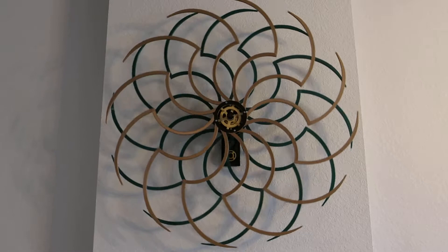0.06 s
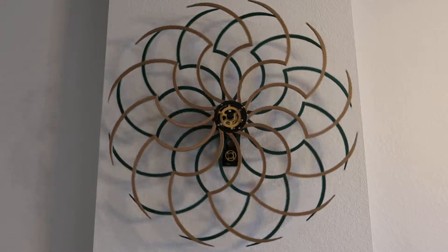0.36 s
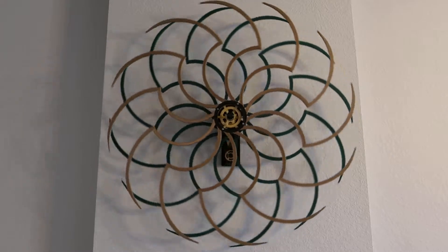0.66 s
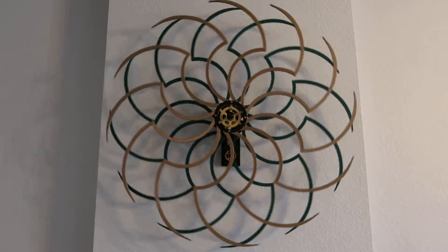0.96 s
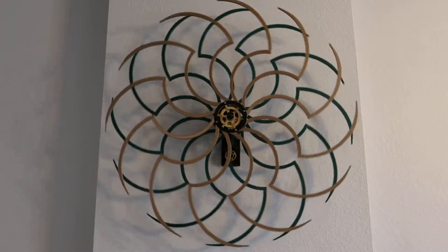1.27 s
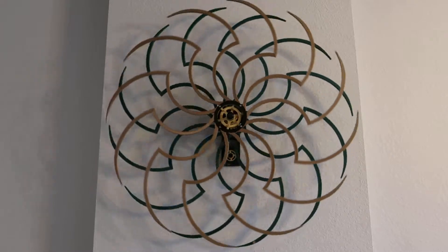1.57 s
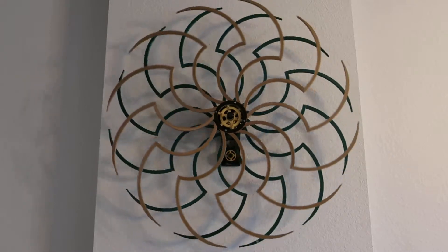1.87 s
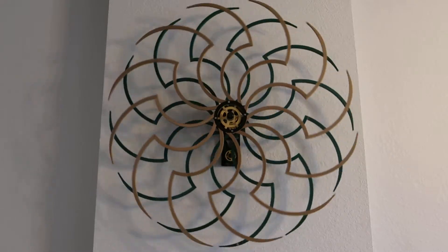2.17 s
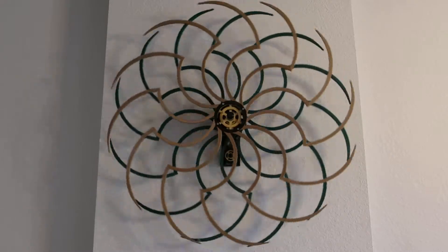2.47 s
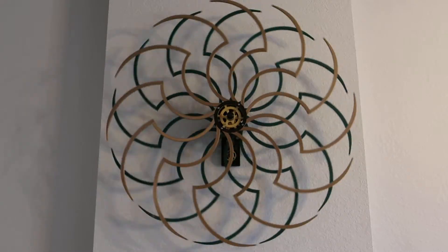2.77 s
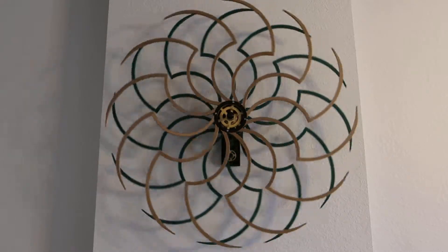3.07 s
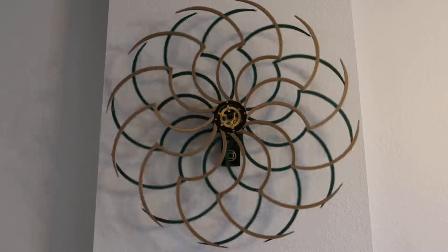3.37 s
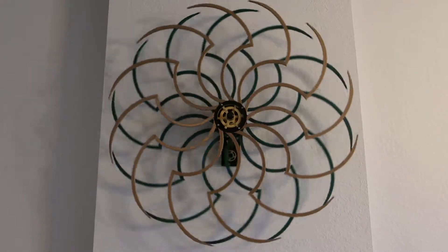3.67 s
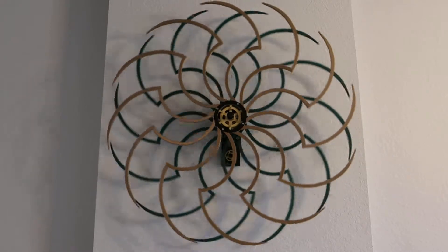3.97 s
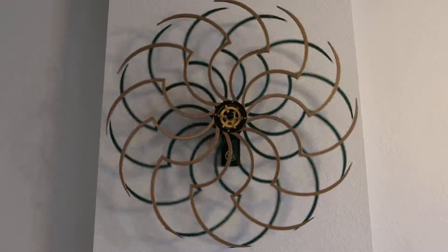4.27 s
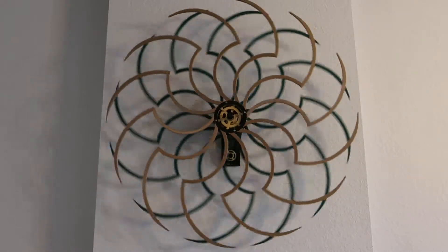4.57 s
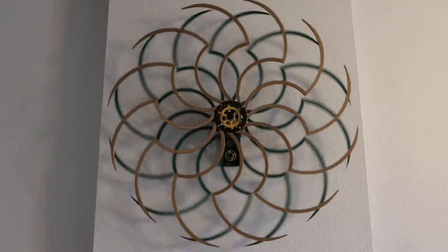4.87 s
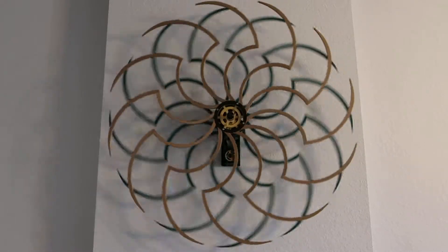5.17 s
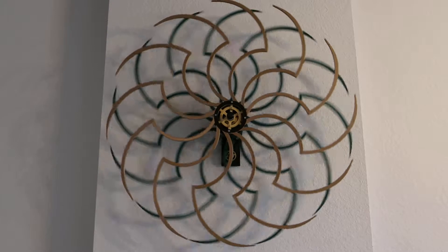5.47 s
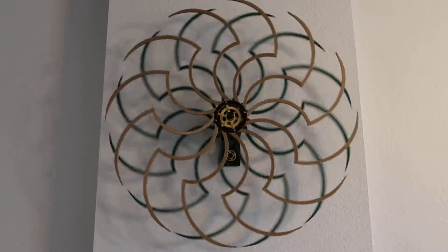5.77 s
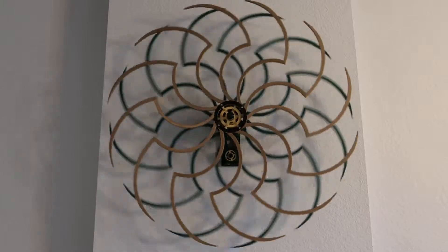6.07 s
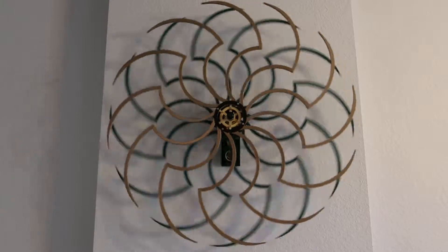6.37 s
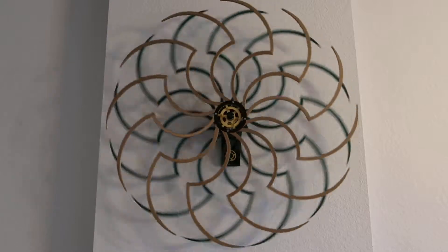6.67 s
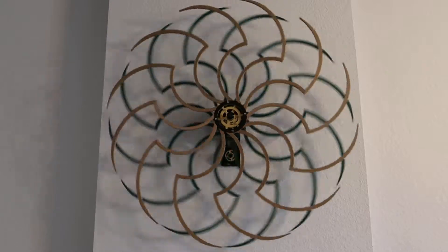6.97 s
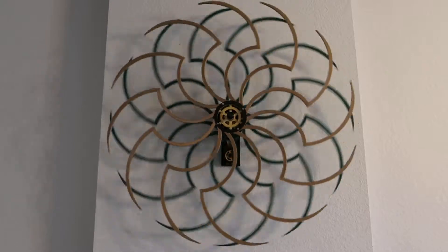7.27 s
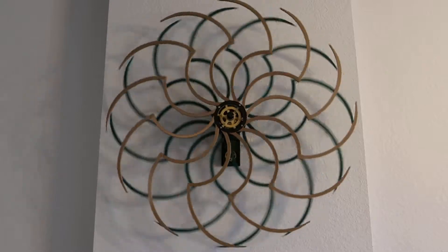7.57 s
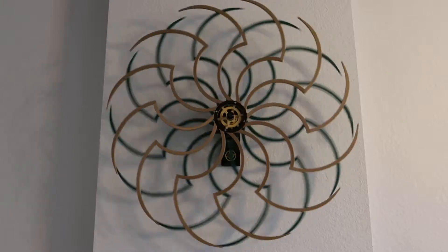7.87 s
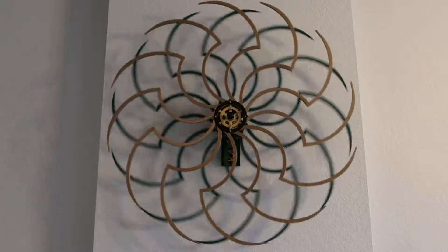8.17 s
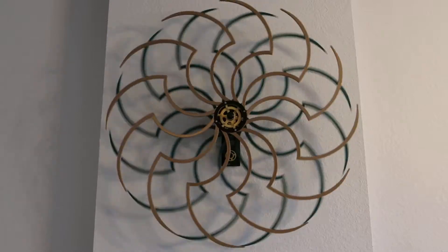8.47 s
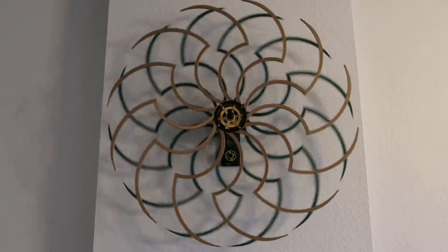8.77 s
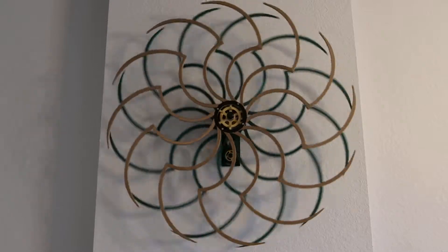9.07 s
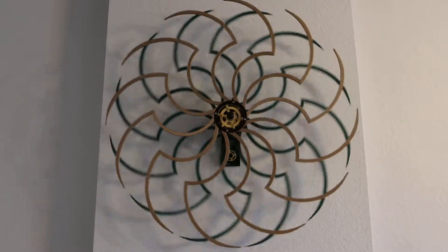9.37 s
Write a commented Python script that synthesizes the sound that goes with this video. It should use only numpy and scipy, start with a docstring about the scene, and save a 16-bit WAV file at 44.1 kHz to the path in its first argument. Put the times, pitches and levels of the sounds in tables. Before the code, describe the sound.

A spring-driven wooden sculpture turns in a small, bare room with a short echo. A faint low appliance hum continues throughout. Soft knocks and light taps open, followed by a wooden clack and bright metal click at about 1.1 seconds. After a lull, a ratchet ticks rapidly and rasps from 2.9 to 4.1 seconds, swelling and fading over the soft drone of a sliding wheel. Scattered clacks and clicks follow between 4.3 and 5 seconds. At 5.3 seconds a hard knock, the loudest sound, briefly rings the wooden body. Three shorter, faster runs of rasping ticks come at about 5.4 to 5.8, 6.9 to 7.4 and 8.5 to 9.1 seconds. Between them, levers clack on wooden stops and a metal catch clicks, around 6, 6.5 to 6.7, 7.6 and 8.1 to 8.4 seconds. A last clack lands near 9.3 seconds.

```python
"""A spring-driven wooden kinetic sculpture turns on the wall of a small, bare room; an appliance hums.
First, levers clack on wooden stops, a metal catch clicks and the drive knocks softly on the frame.
From 2.9 to 4.1 s a pawl ticks and rasps over ratchet teeth while the sliding wheel drones.
At 5.3 s a hard knock rings the frame. Three shorter ratchet runs follow at 5.4, 6.9 and 8.5 s,
with clacks and clicks in between."""
import sys
import numpy as np
from scipy import signal
from scipy.fft import rfft, irfft, next_fast_len
from scipy.io import wavfile
from scipy.ndimage import uniform_filter1d

SR = 44100
rng = np.random.default_rng(int(sys.argv[2]) if len(sys.argv) > 2 else 0)


def wav_record(signal):
    """Record a signal, one row per channel, as 16-bit PCM in the file named by sys.argv[1]."""
    frames = np.transpose(np.atleast_2d(signal))
    bounded = np.clip(frames, -1, 1)
    # unit amplitude maps onto the largest positive 16-bit level
    quanta = np.round(bounded * 32767).astype(np.int16)
    wavfile.write(sys.argv[1], SR, quanta)


N = 415422

# spectra of still air and room rumble: (frequency [Hz], density [dB])
AIR_SPECTRUM = [(15,-37),(45,-13.5),(80,-9.5),(119,-2),(155,-16.5),(215,-8.5),(380,-15),(600,-21),(1200,-24),(2500,-29),(6000,-37),(9000,-44),(12000,-54),(15500,-65)]
RUMBLE_SPECTRUM = [(15,-1),(35,-1),(68,6),(95,-7.5),(138,5),(190,-10.5),(280,-10),(390,-7),(520,-17.5),(1500,-76)]
# rumble envelope: (time [s], level [dB])
RUMBLE_LEVELS = [(0.0, -51.5), (1.26, -54.5), (1.86, -59), (2.91, -55.5), (4.99, -55.5), (5.27, -52.5),
                 (9.42, -50)]
# appliance noise bands: (frequency [Hz], width [Hz], level [dB])
HUM_BANDS = [(118.6,16.6,-57),(1150,7.3,-72.5),(1146,115,-68.5)]
# room decay: (frequency [Hz], T60 [s])
ROOM_DECAY = [(100,0.73),(500,0.4),(2000,0.66),(5000,0.58),(9000,0.49),(15000,0.37)]
# stereo width of echo and air: (frequency [Hz], side minus mid [dB])
ECHO_STEREO = [(40,-36),(160,-28),(380,-17),(1000,-21),(2500,-13.5),(6000,-5.5),(13000,1)]
AIR_STEREO = [(30,-28),(70,-44),(120,-9.5),(200,-3.5),(400,4),(900,5.5),(7000,5),(14000,12)]

# blows on the frame: (time [s], level [dB], contact resonance [Hz], Q [-])
FRAME_BLOWS = [(0.143,-44,245,2.5),(0.219,-53,322,5.8),(1.086,-39,390,2.4),(1.099,-44.5,367,11.4),(1.119,-42,127,2.2),(1.208,-54,348,3),(4.050,-46.5,340,2.3),(4.913,-52.5,810,2.8),(5.258,-32.5,3000,0.96),(5.269,-22,5000,0.11),(5.281,-33.5,3000,0.83)]
# frame modes: (frequency [Hz], level [dB], T60 [s])
FRAME_MODES = [(65.8,-6.5,1.0),(128.8,1,0.31),(170.2,1,0.53),(242,-0.5,0.66),(291,5,0.26),(386,-1,0.345),(420,6,0.077),(533,-16,0.37),(578,-4,0.28),(677,-9,0.12),(770,3,0.3),(886,2.5,0.52),(940,0,0.2),(1080,-7,0.19),(1357,-12,0.48),(1776,-7,.3),(2330,-11,.45),(2502,-4,.4),(2520,1,.45)]
# dense frame modes, heard as a crack: (frequency [Hz], density [dB])
CRACK_SPECTRUM = [(35,-25),(100,-2),(280,1.5),(450,-2),(850,1.5),(1080,-25),(1220,-19),(1400,-1.5),(1600,-14),(2000,-4.5),(2550,-1),(3500,-8),(4500,-27),(7000,-2.5),(15000,-19.5)]

# lever falls on its stop: (time [s], level [dB], relative rebound [dB])
LEVER_FALLS = [(0.308,-57,0.5),(0.780,-60,-13),(1.117,-48.5,-7),(3.786,-45,-20),(4.306,-44.5,-23),(4.354,-48,-23),(5.120,-58.5,-14),(5.259,-32.5,-2),
               (6.036,-44,-4),(6.746,-50.5,-2),(7.631,-48,-4.5),(8.136,-45,-21),(8.394,-52,-3),(9.326,-45.5,-0.5)]
# catch drops in: (time [s], ring [dB], snap [dB], ping 1 [Hz], ping 1 [dB], ping 2 [Hz], ping 2 [dB])
CATCH_DROPS = [(1.082,-42.5,-43.5,5700,-48,3050,-52),(1.114,-43,-58,5570,-44,6260,-46),(2.515,-59,-55.5,4220,-55,6540,-63),(3.802,-45,-58,5650,-45,6240,-51),
               (4.318,-41.5,-48,4500,-49,5560,-44),(4.63,-48.5,-59,3640,-51.5,5540,-67),(4.693,-42.5,-47.5,5470,-40.5,6460,-46),(4.995,-47,-62,3570,-60,5660,-62),
               (5.008,-48,-48,3710,-49.5,7100,-50),(5.245,-44,-54,5400,-53,6300,-57),(5.257,-37,-58,5370,-46,6320,-35.5),(5.274,-32,-34.5,5730,-41,7480,-40),
               (6.500,-41,-42.5,5580,-48,6520,-44),(6.607,-57,-42.5,5600,-58,7200,-53),(6.643,-54,-49,5590,-53,6400,-62),(6.669,-59,-56,5540,-50,6400,-59),
               (6.746,-53,-53,5650,-48,6350,-48),(8.136,-41.5,-46,5540,-47,6500,-44),(8.246,-58,-44,5590,-60,7100,-57),(8.291,-55,-52,5580,-52,6500,-56),
               (8.395,-55,-53,5700,-44.5,6400,-53),(8.415,-44.5,-54,5630,-49,6600,-54)]
# resonances of lever, catch, its snap, pawl and wheel rim: (frequency [Hz], width [Hz], level [dB])
LEVER_MODES = [(720,280,4),(1067,99,8),(1306,100,4),(1876,345,7),(2083,394,8),(2820,420,5.5),(3640,480,4),(4770,660,1.5),(5370,420,-1.5)]
CATCH_MODES = [(3250,340,0.5),(3770,340,0.5),(4200,270,-11),(5490,320,3.5),(6370,330,1),(6980,560,-2.5)]
SNAP_MODES = [(2780,1050,-0.5),(8120,1600,2.5),(8800,1600,4.5),(10040,700,4),(11440,900,-1.5),(13000,840,-1.5)]
PAWL_MODES = [(2580,390,4),(3040,170,10),(3650,770,7),(4490,146,13.5),(5370,910,3),(7180,1060,5.5),(8320,270,5),(9300,1260,2),(11300,3100,-6),(13600,1900,-9)]
RIM_MODES = [(1048.4,30.5,11.5),(1843,410,1.5),(2180,385,5),(3100,370,2),(3800,170,6.5),(4590,480,4.5),(5800,1200,-1),(7480,1140,-1.5),(8900,1600,-10),(12900,1800,-19.5)]

# sliding wheel: (frequency [Hz], density [dB])
DRONE_SPECTRUM = [(80,8),(150,-4.5),(270,2.5),(420,2),(650,1),(950,-1),(1280,-6.5),(1550,-21),(3000,-51)]
# wheel spins under the pawl: (start [s], peak [s], end [s], rasp [dB], drone [dB])
WHEEL_RUNS = [(2.892,3.315,4.1,-46.5,-50), (5.38,5.46,5.82,-43,-46), (6.89,7.032,7.43,-45,-48.5),
              (8.515,8.72,9.1,-44.5,-52)]
# wheel drags briefly: (time [s], level [dB])
WHEEL_DRAGS = [(2.92,-49),(4.08,-48.5),(5.16,-44.5),(8.70,-43),(9.40,-42.5)]
# pawl drops off unevenly cut teeth: (time [s], level [dB])
TOOTH_DROPS = [(2.7192, -55), (2.784, -50), (2.8806, -41.5), (2.9367, -39.5), (2.9952, -37.5), (3.052, -37),
               (3.1098, -37), (3.1648, -34.5), (3.2213, -33.5), (3.279, -35.5), (3.3373, -36),
               (3.3948, -35.5), (3.4486, -39.5), (3.5059, -37.5), (3.5571, -39.5), (3.6125, -39.5),
               (3.6674, -37.5), (3.7219, -39.5), (3.78, -41), (3.833, -41.5), (3.8916, -44), (3.9378, -41),
               (4.055, -52), (5.1846, -44), (5.3994, -35.5), (5.4287, -38.5), (5.458, -35.5),
               (5.4905, -38.5), (5.522, -37), (5.5538, -35), (5.588, -41), (5.6167, -35), (5.655, -41),
               (5.6778, -41), (5.7084, -41), (5.7465, -39.5), (5.7845, -43), (6.8494, -39), (6.863, -41),
               (6.8932, -40), (6.925, -37), (6.9597, -37), (6.99, -35), (7.0252, -35.5), (7.0612, -37.5),
               (7.0838, -39), (7.116, -36.5), (7.1516, -37), (7.189, -38.5), (7.222, -39), (7.259, -38),
               (7.2978, -40), (7.3324, -40), (7.367, -45), (7.4066, -46), (8.4728, -40), (8.5182, -34.5),
               (8.552, -37), (8.5834, -40), (8.6154, -40.5), (8.6472, -35), (8.6832, -36.5), (8.7144, -38),
               (8.7472, -37), (8.783, -38), (8.819, -39), (8.8555, -38), (8.8935, -34.5), (8.9328, -37.5),
               (8.976, -41), (9.0147, -43), (9.0538, -49), (9.1012, -47)]
# sharp pawl partials: (centre [s], half length [s], frequency [Hz], gain [dB])
PAWL_PARTIALS = [(2.70,0.13,4560,4),(2.935,0.13,8440,-12),(3.064,0.072,5920,-5.5),(3.42,0.089,4400,-6),(3.53,0.14,2220,-7.5),(3.58,0.092,3900,-9),(3.704,0.12,6050,-5),
                 (5.558,0.068,4140,-9),(5.62,0.27,8240,-10),
                 (6.94,0.053,8300,-11),(6.96,0.069,4030,-8),(7.03,0.046,4740,-4),(7.12,.07,7050,-4),(7.22,0.039,5760,-4),
                 (8.75,0.05,3770,-6),(8.88,0.088,6000,-9),(8.92,0.08,4540,-7)]


def from_db(db):
    """Decibels to gain."""
    return 10 ** (np.asarray(db) / 20)


def rms_one(x):
    """Scale to rms 1."""
    return x / np.sqrt(np.mean(x ** 2) + 1e-20)


def at_hz(points, hz):
    """Read a table on a log-frequency axis."""
    table_hz, value = np.transpose(points)
    return np.interp(np.log(np.maximum(hz, 1)), np.log(table_hz), value)


def add(out, time_s, sound):
    """Mix a sound in at time_s."""
    start = int(time_s * SR)
    part = sound[..., :max(out.shape[-1] - start, 0)]
    out[..., start:start + part.shape[-1]] += part


def diffuse(size, stereo, colour=lambda hz: 1):
    """Stereo noise of given width and colour; mid rms 1."""
    hz = np.fft.rfftfreq(size, 1 / SR)
    mid, side = rfft(rng.standard_normal((2, size))) * colour(hz)
    mid, side = irfft(mid, size), irfft(side * from_db(at_hz(stereo, hz)), size)
    return (mid + side * [[1], [-1]]) / np.std(mid)


def steady(spectrum, stereo):
    """Scene-long stereo noise of given spectrum."""
    return diffuse(next_fast_len(N), stereo, lambda hz: from_db(at_hz(spectrum, hz)))[:, :N]


def resonate(force, modes):
    """Damped modes of a small part in parallel; unit power gain."""
    t = np.arange(SR // 20) / SR
    response = sum((-1) ** k * from_db(db) * width_hz * np.exp(-np.pi * width_hz * t)
                   * np.cos(2 * np.pi * hz * t) for k, (hz, width_hz, db) in enumerate(modes))
    return signal.oaconvolve(force, response / np.linalg.norm(response))[:N]


def chatter(rise_s, fade_s):
    """Force of one contact: fine chatter builds and dies."""
    t = np.arange(SR // 20) / SR
    shape = (1 - np.exp(-(t / rise_s) ** 2)) * np.exp(-t / fade_s)
    return rng.standard_normal(len(t)) * shape / shape.max()


def background(whine_hz=1137, whine_db=-69):
    """Still air, low rumble, an appliance's wavering hum and thin whine."""
    hum = 0
    for hz, width_hz, db in HUM_BANDS:
        band = diffuse(next_fast_len(N), ECHO_STEREO, lambda f: 1 / (1 + (2 * (f - hz) / width_hz) ** 2))
        hum = hum + from_db(db) * band[:, :N]
    t = np.arange(N) / SR
    whine = from_db(whine_db) * np.sqrt(2) * np.sin(2 * np.pi * whine_hz * t)
    rumble_db = np.interp(t, *np.transpose(RUMBLE_LEVELS)) + 1
    rumble = from_db(rumble_db) * steady(RUMBLE_SPECTRUM, ECHO_STEREO)
    return from_db(-53) * steady(AIR_SPECTRUM, AIR_STEREO) + rumble + hum + whine


def room_response(gap_s, early_s, early_db):
    """Dense early reflections and a tail decaying per band; unit energy per channel."""
    t = np.arange(SR * 3 // 4) / SR
    hz = np.fft.rfftfreq(len(t), 1 / SR)
    spectrum = rfft(diffuse(len(t), ECHO_STEREO))
    edges_hz = np.geomspace(60, 18000, 13)
    tail = 0
    for low, high in zip(edges_hz, edges_hz[1:]):
        band = irfft(spectrum * ((hz >= low) & (hz < high)), len(t))
        t60_s = at_hz(ROOM_DECAY, np.sqrt(low * high))
        tail = tail + band * np.exp(-np.log(1000) * t / t60_s)
    onset = np.clip(t / gap_s - 1, 0, 1)
    tail = tail * onset * (1 + from_db(early_db) * np.exp(-t / early_s))
    return tail / np.sqrt(np.sum(tail ** 2) / 2)


def frame_knocks(crack_s, swell_s, lowest_hz=50):
    """Blows ring the frame under a short crack; soft blows reach only the low modes."""
    boom, crack = np.zeros((2, N))
    t = np.arange(SR) / SR
    ring = sum(from_db(db) * np.sin(2 * np.pi * hz * t) * np.exp(-np.log(1000) * t / t60_s)
               for hz, db, t60_s in FRAME_MODES)
    radiation = signal.butter(2, lowest_hz, "high", fs=SR, output="sos")   # small frame: no deep bass
    ring = signal.sosfilt(radiation, ring * (1 - np.exp(-t / swell_s)))
    colour = from_db(at_hz(CRACK_SPECTRUM, np.fft.rfftfreq(SR, 1 / SR)))
    for time_s, db, contact_hz, q in FRAME_BLOWS:
        w = 2 * np.pi * contact_hz
        springy_contact = signal.bilinear([w * w], [1, w / q, w * w], SR)   # resonant low-pass
        add(boom, time_s, from_db(db - 9) * signal.lfilter(*springy_contact, ring))
        burst = rms_one(irfft(rfft(rng.standard_normal(SR)) * colour, SR)) * np.exp(-t / crack_s)
        add(crack, time_s, from_db(db) * signal.lfilter(*springy_contact, burst))
    return boom, crack


def struck(times_s, levels_db, modes, rise_s, fade_s, detune=0.015, scatter_db=2):
    """Contacts on a small part; each lands elsewhere, so the modes vary in pitch and level."""
    out = np.zeros(N)
    for time_s, db in zip(times_s, levels_db):
        shifts = rng.standard_normal((len(modes), 2))
        shifted = [(hz * (1 + detune * a), width_hz, mode_db + scatter_db * b)
                   for (hz, width_hz, mode_db), (a, b) in zip(modes, shifts)]
        add(out, time_s, from_db(db) * resonate(chatter(rise_s, fade_s), shifted))
    return out


def catch_pings(rise_s=0.00066, fade_s=0.0026):
    """Each drop of the catch rings two partials, set by where it lands."""
    out, t = np.zeros(N), np.arange(SR // 10) / SR
    envelope = (1 - np.exp(-t / rise_s)) * np.exp(-t / fade_s)
    for time_s, _, _, ping1_hz, ping1_db, ping2_hz, ping2_db in CATCH_DROPS:
        for hz, db in ((ping1_hz, ping1_db), (ping2_hz, ping2_db)):
            add(out, time_s, from_db(db) * envelope * np.sin(2 * np.pi * hz * t))
    return out


def levers(rebound_s=0.0195, to_ring_db=-1, to_snap_db=-12.5, to_wood_db=-7):
    """A lever clacks on wood and rebounds once; its catch rings and snaps. Each shakes the other."""
    falls = [(s, db) for s, db, _ in LEVER_FALLS]
    falls += [(s + rebound_s, db + rebound_db) for s, db, rebound_db in LEVER_FALLS]
    contacts = [(s, db, db + to_ring_db, db + to_snap_db) for s, db in falls]
    contacts += [(s, db + to_wood_db, db, snap_db) for s, db, snap_db, *_ in CATCH_DROPS]
    times_s, wood_db, ring_db, snap_db = np.transpose(contacts)
    onsets_s = times_s - 0.001   # contact begins just before it is heard
    clack = from_db(-2.5) * struck(onsets_s, wood_db, LEVER_MODES, rise_s=0.0037, fade_s=0.0032)
    ring = from_db(-2.5) * struck(onsets_s, ring_db, CATCH_MODES, rise_s=0.0029, fade_s=0.002)
    snap = from_db(-0.5) * struck(onsets_s, snap_db, SNAP_MODES, rise_s=0.0015, fade_s=0.0027)
    return clack, ring + from_db(7.5) * catch_pings(), snap


def wheel_drone(drag_s=0.065, fade_db=-6.5, rise_db_per_s=54, coast_db_per_s=8):
    """The sliding wheel drones: a swell per drag, a longer one per run that coasts away."""
    t = np.arange(N) / SR
    gain = sum(from_db(db) * np.exp(-((t - time_s) / drag_s) ** 2) for time_s, db in WHEEL_DRAGS)
    for start_s, peak_s, end_s, _, drone_db in WHEEL_RUNS:
        before_s, after_s = np.maximum(start_s - t, 0), np.maximum(t - end_s, 0)
        run_db = drone_db + np.interp(t, [peak_s, end_s], [0, fade_db])
        gain = np.hypot(gain, from_db(run_db - rise_db_per_s * before_s - coast_db_per_s * after_s))
    return gain * steady(DRONE_SPECTRUM, ECHO_STEREO)


def pawl_friction(clump_db, grains_per_s=2500, creep_s=0.39, engage_s=0.096, stop_db_per_s=302):
    """Wood grain catches and frees the pawl; each run creeps, engages, swells, fades and stops."""
    t, gain = np.arange(N) / SR, 0
    for start_s, peak_s, end_s, rasp_db, _ in WHEEL_RUNS:
        swell_db = np.interp(t, [start_s - engage_s, start_s, peak_s, end_s], [-13.5, -5.5, 0, -6])
        stop_db = stop_db_per_s * np.maximum(t - end_s, 0)
        gain = gain + (start_s - t < creep_s) * from_db(rasp_db + swell_db - stop_db)
    wander = rms_one(uniform_filter1d(rng.standard_normal(N), size=200))
    grip = from_db(clump_db * np.tanh(wander))
    grains = (rng.random(N) < grains_per_s / SR) * rng.choice([-1, 1], N) * rng.random(N)
    return gain * rms_one(grains * grip)


def pawl_singing(force, q=85):
    """As the contact point travels, sharp partials take up the pawl's force and let go."""
    out = np.zeros(N)
    for centre_s, half_s, hz, db in PAWL_PARTIALS:
        start_s = max(centre_s - 3 * half_s, 0)
        stretch = force[int(start_s * SR):int((2 * centre_s - start_s) * SR)]
        t = start_s + np.arange(len(stretch)) / SR
        coupling = from_db(db) * np.exp(-((t - centre_s) / half_s) ** 2 / 2)
        add(out, start_s, resonate(stretch * coupling, [(hz, hz / q, 0)]))
    return out


def pawl_drop(bounces=4, gap_s=0.008, bounce_db=-4, loss_db=0.5, scatter_db=7.7):
    """Force of the pawl dropping off one tooth and bouncing loosely."""
    force, time_s = np.zeros(SR // 6), 0
    add(force, time_s, chatter(rise_s=0.003, fade_s=0.0025))
    for k, (late, weaker) in enumerate(rng.random((bounces, 2))):
        time_s += gap_s * (0.5 + late)
        gain = from_db(bounce_db - loss_db * k - scatter_db * weaker)
        add(force, time_s, gain * chatter(rise_s=0.00099, fade_s=0.0006))
    return force


def ratchet(colour_db, clump_db):
    """The pawl ticks off each tooth in a new colour; its friction rasps on the wheel rim."""
    force, ticks = np.zeros((2, N))
    for time_s, db in TOOTH_DROPS:
        drop = from_db(db) * pawl_drop()
        modes = [(hz, width_hz, mode_db + colour_db * rng.standard_normal())
                 for hz, width_hz, mode_db in PAWL_MODES]
        add(force, time_s, drop)
        add(ticks, time_s, resonate(drop, modes))
    friction = pawl_friction(clump_db)
    ticks += pawl_singing(force + from_db(-17) * friction)
    return from_db(-7.5) * ticks, from_db(-7) * resonate(friction, RIM_MODES)


def scene(beam_hz=5000):
    """Small bright parts beam straight ahead; wooden ones mostly fill the room."""
    ticks, rasp = ratchet(colour_db=3, clump_db=10.5)
    drone = from_db(-7.5) * wheel_drone()
    clack, ring, snap = levers()
    boom, crack = frame_knocks(crack_s=0.021, swell_s=0.001)
    tick_treble = signal.sosfilt(signal.butter(1, beam_hz, "high", fs=SR, output="sos"), ticks)
    direct = from_db(4) * tick_treble + rasp + clack + ring + snap + from_db(2) * crack
    room_send = (from_db(2) * ticks + from_db(1) * rasp + from_db(9) * clack
                 + from_db(3) * ring + from_db(2) * snap + from_db(4) * crack)
    response = room_response(gap_s=0.0024, early_s=0.019, early_db=-1.5)
    echo = signal.oaconvolve(room_send[None], response, axes=1)[:, :N]
    return direct + echo + boom + drone + background()


def record(dry, cutoff_hz=15600):
    """Steep low-pass."""
    return signal.sosfilt(signal.ellip(10, 0.1, 80, cutoff_hz, fs=SR, output="sos"), dry)


dry = scene()
out = record(dry)
wav_record(out)
```